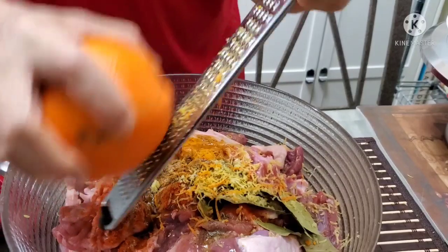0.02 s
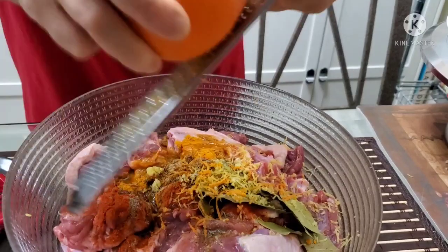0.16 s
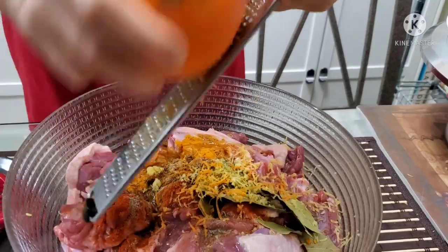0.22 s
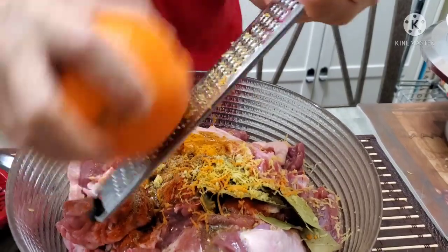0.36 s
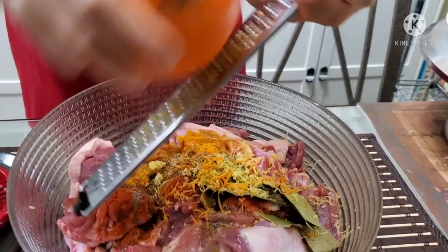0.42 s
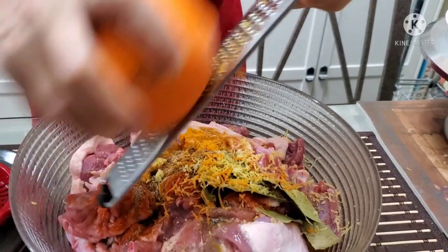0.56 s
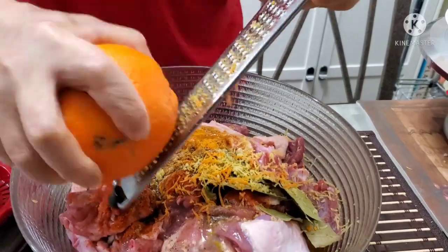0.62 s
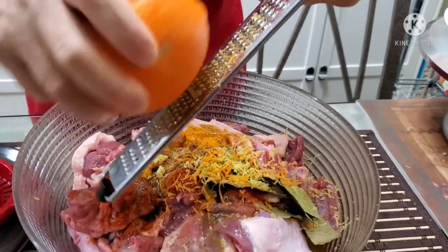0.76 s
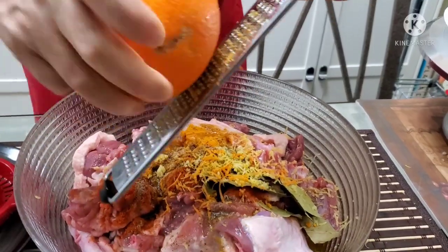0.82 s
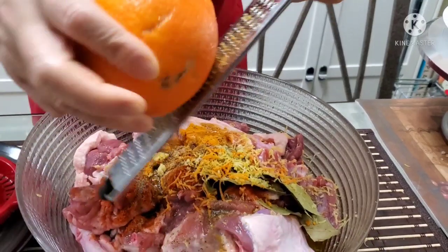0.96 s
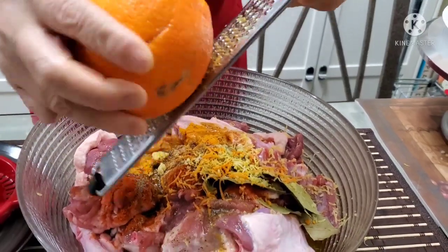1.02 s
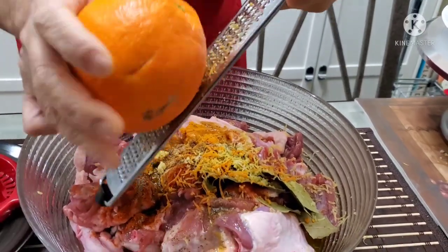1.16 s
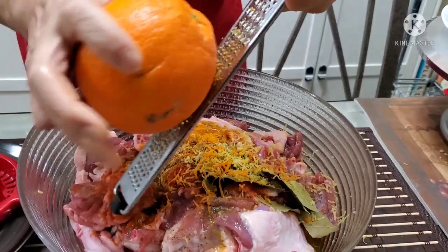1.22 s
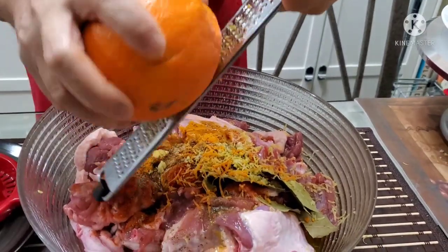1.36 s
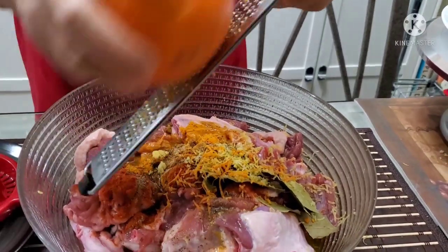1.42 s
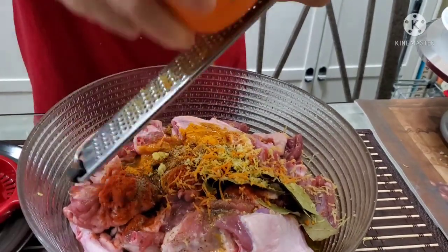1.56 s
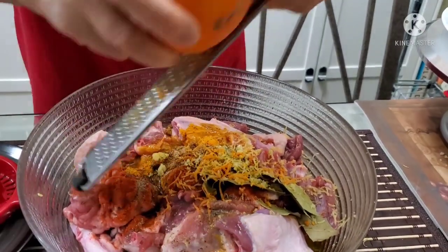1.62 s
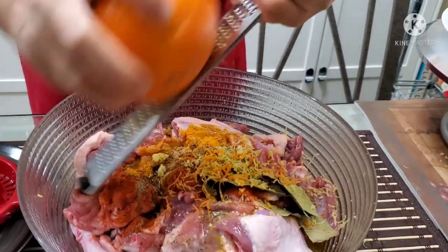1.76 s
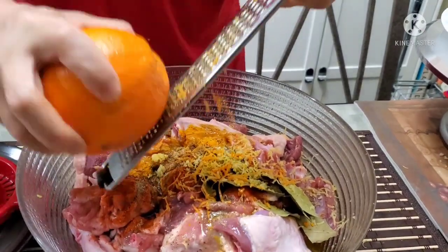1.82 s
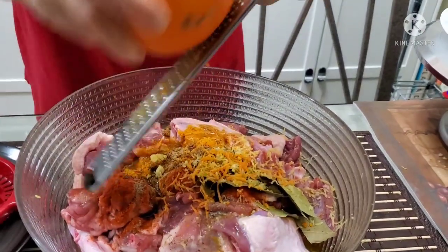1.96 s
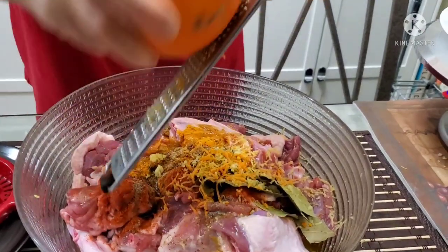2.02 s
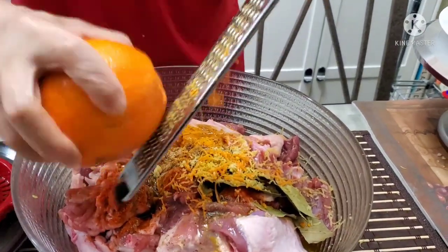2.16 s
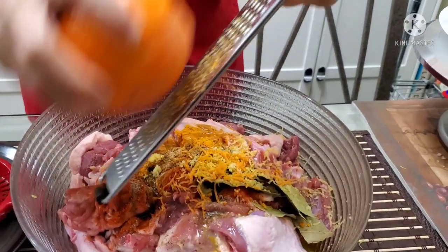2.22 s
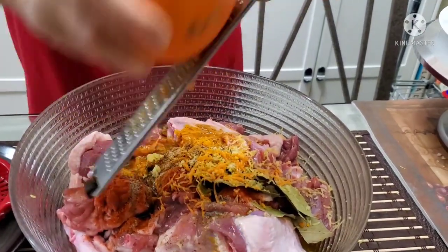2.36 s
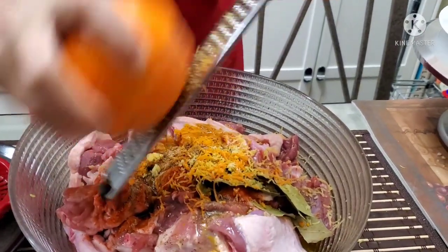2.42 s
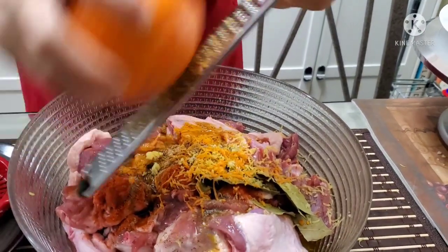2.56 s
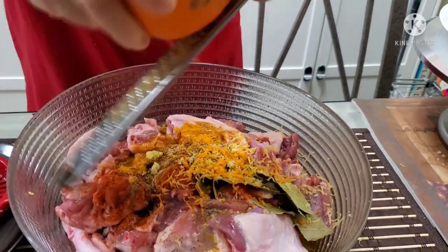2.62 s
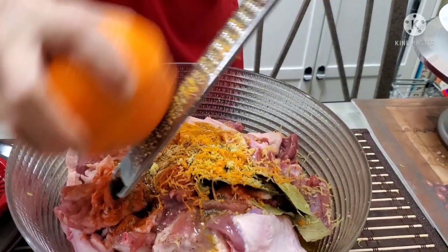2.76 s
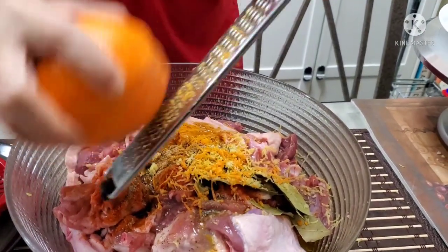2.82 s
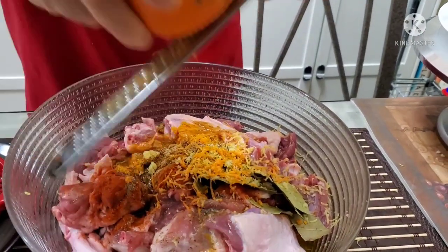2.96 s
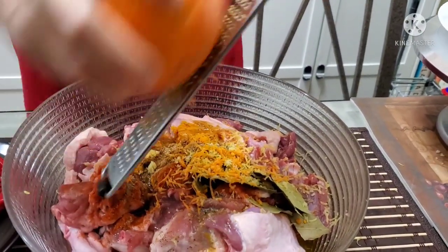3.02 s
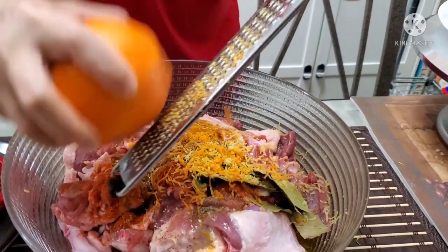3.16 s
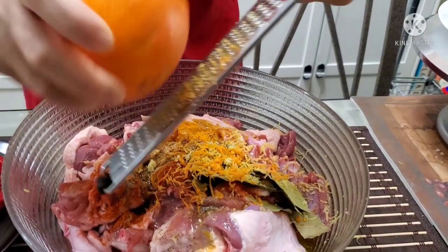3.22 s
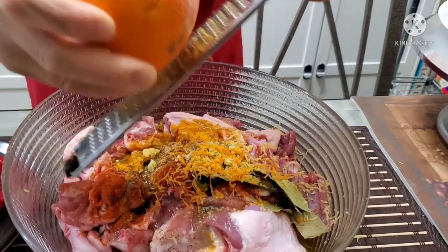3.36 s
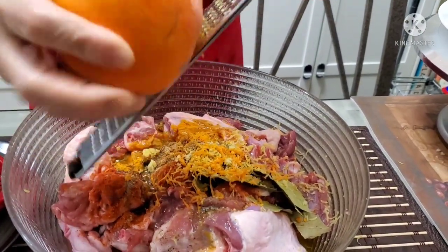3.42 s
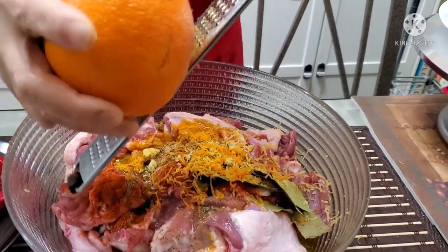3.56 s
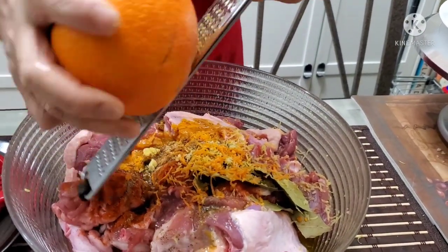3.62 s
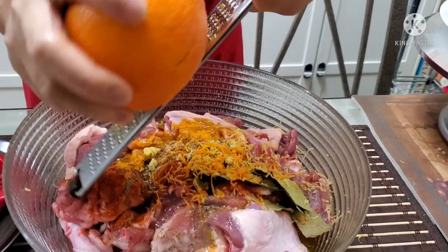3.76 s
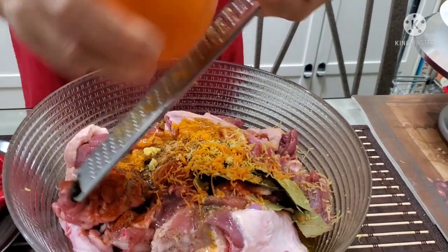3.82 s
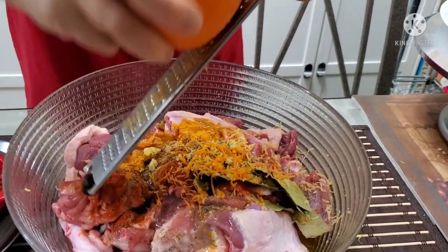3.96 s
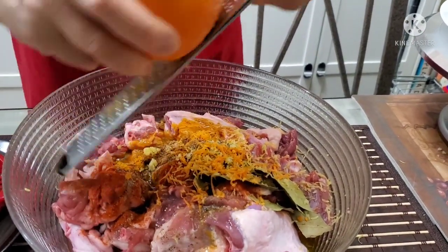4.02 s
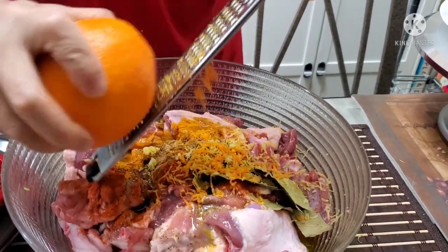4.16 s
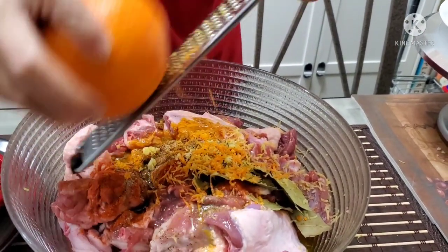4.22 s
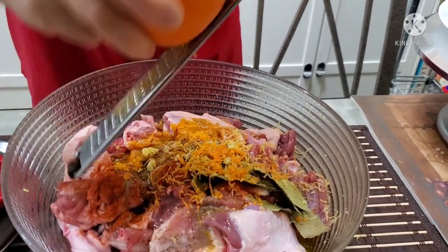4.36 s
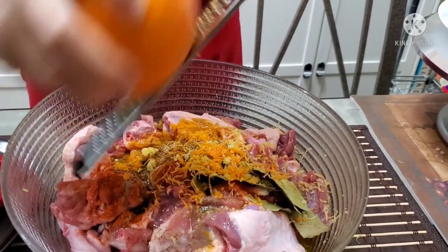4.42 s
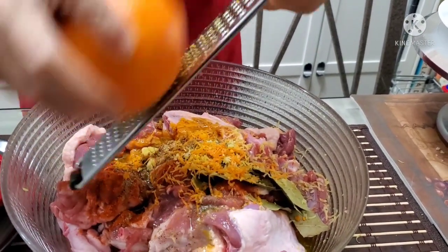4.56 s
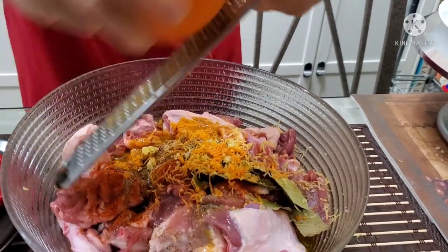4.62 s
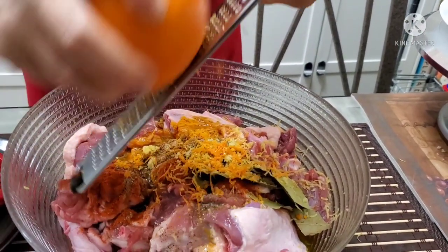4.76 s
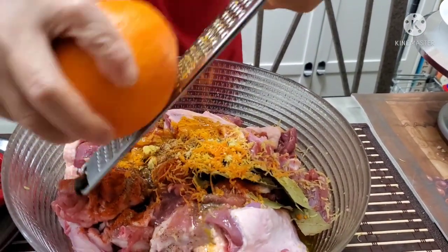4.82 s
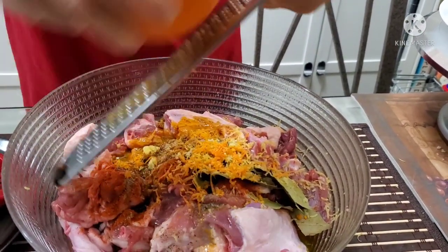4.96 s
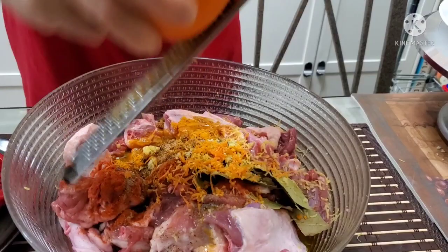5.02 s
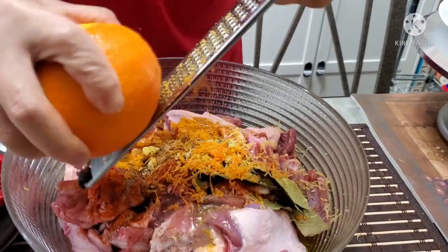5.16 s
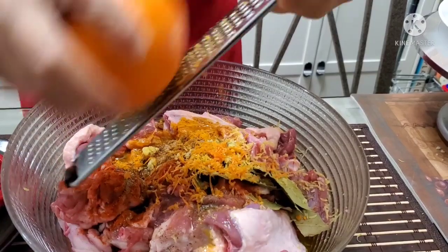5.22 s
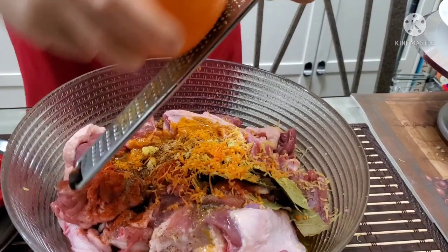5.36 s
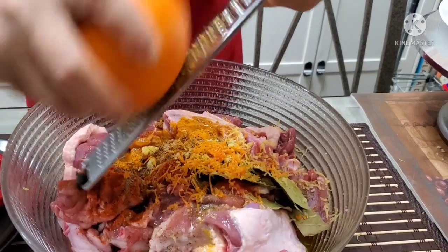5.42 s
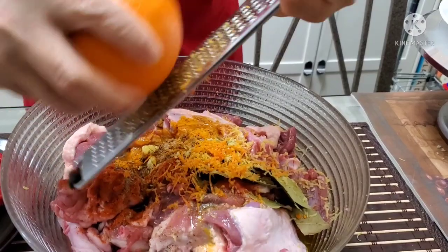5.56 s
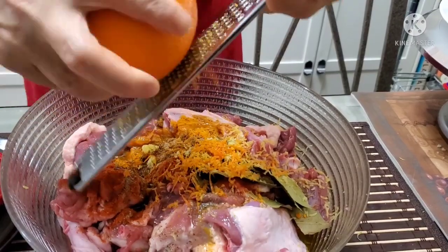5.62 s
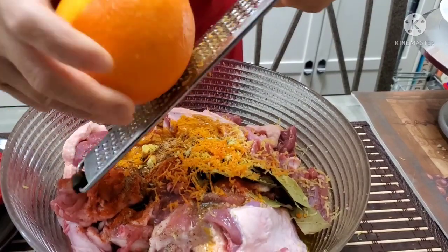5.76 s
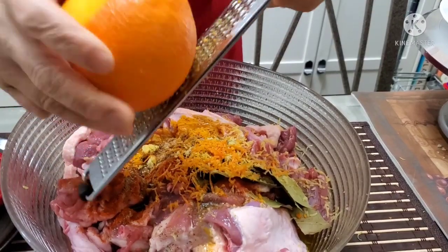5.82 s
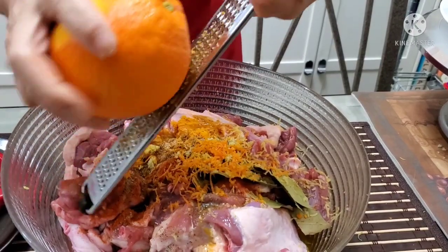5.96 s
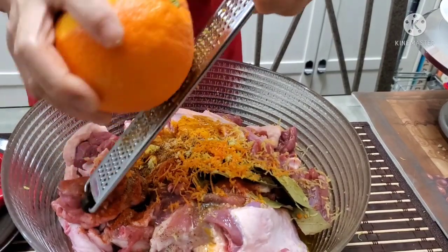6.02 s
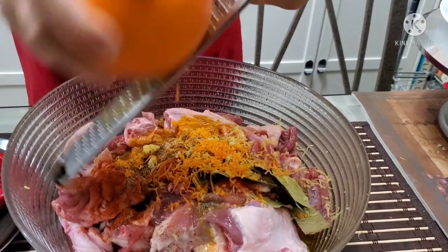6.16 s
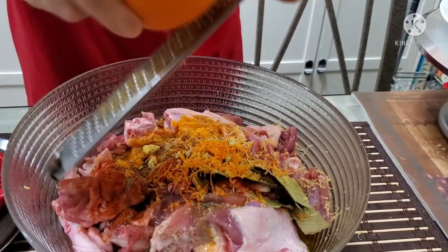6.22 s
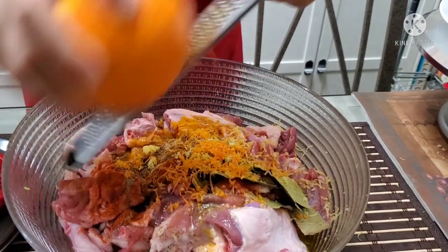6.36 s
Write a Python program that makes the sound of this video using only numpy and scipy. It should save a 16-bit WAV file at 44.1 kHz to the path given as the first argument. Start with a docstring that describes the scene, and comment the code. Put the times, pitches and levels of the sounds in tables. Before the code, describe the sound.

An orange is zested on a metal rasp in quick runs of scraping strokes, over a faint kitchen hum.

```python
"""Small kitchen, stereo microphone close to a long steel rasp over a glass bowl; an appliance hums.
An orange is being zested: each stroke drags the peel over rows of teeth, so fibres snap, the blade
rings and the oil fizzes. Three quick strokes open, the blade's tip bumping the bowl just after the
first. Before most strokes the fruit lands with a soft knock and a tick; fingers turn it between runs.
Runs of five follow at 1.8 s and 4.1 s, and a last run is just starting at 6.4 s."""
import sys
import numpy as np
from scipy import signal
from scipy.fft import rfft, irfft
from scipy.io import wavfile
from scipy.ndimage import uniform_filter1d, map_coordinates

SR = 44100
rng = np.random.default_rng(int(sys.argv[2]) if len(sys.argv) > 2 else 0)


def store_wav(level_fs):
    """Save 16-bit WAV to argv[1]."""
    pcm = np.round(np.clip(np.atleast_2d(level_fs), -1, 1) * 32767)
    wavfile.write(sys.argv[1], SR, pcm.T.astype(np.int16))


N = 282240
TIME = np.arange(N) / SR

# Event levels are relative, ahead of each layer's gain.
# peel drawn down the rasp: t/s, length/s, level/dB, extra ring/dB
PEEL_STROKES = [(-.022, 0.12, -26, -0.5), (0.292, 0.13, -28, 2.5), (0.601, 0.13, -26.5, .5),
                (1.757, 0.18, -30, -1.5), (2.123, 0.13, -29, -1), (2.445, 0.14, -29, 2),
                (2.758, .13, -27, -0.5), (3.083, 0.12, -26.5, -.5), (4.131, 0.14, -26.5, -8.5),
                (4.461, .131, -28.5, -1.5), (4.763, 0.19, -31.5, -0.5), (5.119, 0.14, -26.5, 0.5),
                (5.419, .16, -27.5, -4.5), (6.362, 0.15, -35, 3)]
# peel snagging on a few teeth: t/s, level/dB, t60/s, extra fizz/dB
PEEL_SNAGS = [(1.64, -68, 0.56, 8.5), (2.691, -50, .03, 3.5), (3.305, -42, 0.013, -7), (4.1, -53, .011, 16),
              (4.111, -47.5, 0.08, 13), (4.799, -34, 0.021, 0.5), (5.112, -41, 0.015, 3.5),
              (5.61, -38, 0.011, 12), (5.993, -63.5, .04, 21.5)]
# blade's tip bumping in the bowl: t/s, level/dB, t60/s
TIP_BUMPS = [(.133, -20.5, 0.046)]
# modes of the steel blade: f/Hz, width/Hz, relative level/dB
BLADE_MODES = [(559, 76, -15), (651, 54, -8), (931, 88, -9), (1111, 67, -5.5), (1239, 77, 2),
               (1375, 210, -4), (1479, 46, 2.5), (1666, 100, -2), (1747, 39.52, -7), (1952, 37, 0),
               (2145, 130, 0.5), (2217, 55, -0.5), (2414, 120, -18), (2572, 81, -7.5), (3220, 300, -16.5),
               (2990, 58, -10), (3380, 82, -13.5), (5096, 260, -19)]
# two lightly damped modes that linger between strokes: f/Hz, width/Hz, relative level/dB
SINGING_MODES = [(1650, 13, -3), (2300, 12, -1.5)]
# spectrum of tearing peel: f/Hz, relative level/dB
RASP_SPECTRUM = [(100, -4.5), (250, -20), (420, -14), (560, -12), (800, -1.5), (1050, -22), (1500, 6.5),
                 (2150, 1), (2800, -1.5), (4200, -6.5), (7000, -12), (16000, -21)]
# spectrum of the oil spray: f/Hz, relative level/dB
FIZZ_SPECTRUM = [(1000, -32.5), (3500, -21), (5500, -38.5), (7500, -14.5), (10000, -5), (12200, 0.5),
                 (13800, 0.5), (15500, 0.5)]
# spectrum of the blade's low shudder: f/Hz, relative level/dB
SHUDDER_SPECTRUM = [(20, -40), (42, -4.5), (60, -0.5), (90, -7.5), (140, -8.5), (260, -10.5), (600, -35),
                    (3000, -84)]
# fruit landing on the blade: t/s, knock level/dB, knock t60/s, tick level/dB
FRUIT_LANDINGS = [(.262, -42.5, 0.19, -54.5), (0.568, -43, 0.14, -57.5), (2.06, -39.5, 0.048, -45),
                  (2.417, -32, 0.065, -56), (2.717, -45.5, 0.092, -48.5), (3.064, -36.5, 0.28, -48),
                  (4.013, -39, 0.088, -50), (4.406, -37.5, 0.054, -52.5), (5.094, -35.5, 0.16, -50),
                  (5.395, -42.5, .08, -49), (6.331, -43, 0.32, -51.5)]
# fruit turned in the hand: middle t/s, length/s, level/dB, centre f/Hz, width/Hz
FINGER_RUBS = [(1.274, 0.53, -81, 2850, 681), (3.732, 0.41, -79, 11600, 900),
               (3.835, 0.22, -69.5, 1400, 1495)]
# decay of the kitchen's echo: f/Hz, t60/s
ECHO_DECAY = [(150, 0.93), (700, 0.28), (2000, 0.44), (4000, 0.37), (8000, 0.39), (15000, 0.21)]
# strength of that echo: f/Hz, level/dB
ECHO_SPECTRUM = [(100, -14), (600, -7.5), (1800, -10.5), (3500, -7.5), (7000, -9.5), (15000, -8.5)]
# tones of the appliance: f/Hz, relative level/dB
HUM_TONES = [(195, -1.5), (392, -16), (452, -25.5), (587, -27)]
# slow course of its hum: t/s, level/dB
HUM_COURSE = [(0, -55), (1.2, -58.5), (1.45, -55.5), (2.1, -56.5), (3.7, -57.5), (5.4, -55), (6.4, -61)]
# spectrum of the room tone: f/Hz, relative level/dB
ROOM_SPECTRUM = [(20, -37), (40, -4.5), (55, -0.5), (90, -7.5), (140, -5), (220, -4), (330, -8), (480, -16),
                 (750, -25), (1500, -32.5), (3000, -35), (7000, -45.5), (12000, -39.5), (15500, -37.5)]
# likeness of the room tone at the two capsules: f/Hz, correlation (0 to 1)
ROOM_LIKENESS = [(50, 0.84), (160, 0.92), (300, 0.46), (700, 0.13), (2000, 0.15)]
# colour of the two capsules: f/Hz, left minus right level/dB
CAPSULE_BALANCE = [(60, -3.5), (200, -1.5), (380, 6.5), (700, -2), (1300, -0.5), (2400, -.5), (4400, -4),
                   (8100, 1), (15000, 3.5)]


def zesting(speed, place, force, fizz, flex, ring):
    """Close up, rows of teeth bite in turn: fibres snap and rasp, the blade rings, oil sprays."""
    top_rows_hz, steel_hz, climb_hz_per_s, pitch_fall = 225, 1905, 55, 0.038
    bending_below_hz = 1050  # lower modes bend the whole blade
    row_hz = top_rows_hz * (.5 + .5 * speed) * (1 + 0.251 * wander(88.6))
    rows_passed = np.cumsum(row_hz) / SR
    teeth = unit_rms(np.exp(0.32 * np.cos(2 * np.pi * rows_passed)))
    tearing = teeth * snaps(per_s=11000, spread_db=0)
    spray = teeth * snaps(per_s=26000, spread_db=3)  # oil cells burst more densely than fibres break
    plucks = teeth * snaps(per_s=2500, spread_db=1.5)  # tougher fibres pluck the teeth
    # steel damped under the fruit: its pitch creeps up with the work and falls in mid-stroke
    pitch_hz = (steel_hz + climb_hz_per_s * TIME) * (1 - pitch_fall * place)
    damped_steel = unit_rms(resonate(teeth * snaps(per_s=2200, spread_db=1.5), pitch_hz, width_hz=720))
    ringing_modes = [mode for mode in BLADE_MODES if mode[0] >= bending_below_hz]
    bending_modes = [mode for mode in BLADE_MODES if mode[0] < bending_below_hz]
    return (amp(-3) * coloured(force * tearing, RASP_SPECTRUM)
            + amp(-4) * ring * damped_steel
            + amp(-2) * blade(ring * plucks, ringing_modes)
            + amp(-22) * blade(force * spray, SINGING_MODES)
            + amp(-14) * blade(flex * tearing, bending_modes)
            + amp(-22) * coloured(flex * spray, SHUDDER_SPECTRUM)
            + amp(-6) * coloured(fizz * spray, FIZZ_SPECTRUM))


def hand(usual_db=-28, oil_db=2.5, oil_follow=0.94, settle_db=-3.5, settle_t60=.15, flex_lag_s=.011):
    """Each stroke is one arch of speed; its pressure drives the rasp, the fizz and the ring."""
    speed, place, force, fizz, ring = np.zeros((5, N))
    for start, length, db, ring_db in PEEL_STROKES:
        travel = np.clip((TIME - start) / length, 0, 1) ** 1.08  # top speed comes a little late
        swing = (abs(np.sin(np.pi * travel)) * (travel < 1)) ** 1.35  # soft ends
        speed += swing
        place += (2 * travel - 1) * np.sqrt(swing)
        force += amp(db) * swing
        fizz += amp(usual_db + oil_db + oil_follow * (db - usual_db)) * swing
        ring += amp(db + ring_db) * swing ** 1.25
    # after each landing the peel drags a little as it settles
    settles = [(start, db + settle_db, settle_t60, oil_db) for start, _, _, db in FRUIT_LANDINGS]
    for start, db, t60, fizz_db in PEEL_SNAGS + settles:
        drag = burst(start, db, t60)
        force += drag
        ring += drag
        fizz += drag * amp(fizz_db)
    flex = amp(-25.5) * np.interp(TIME - flex_lag_s, TIME, speed)  # every stroke bends the blade alike
    flex += sum(burst(*bump) for bump in TIP_BUMPS)
    return speed, place, force, fizz, flex, ring


def snaps(per_s, spread_db):
    """Fibres or oil cells breaking: random clicks whose sizes scatter by spread_db."""
    size = amp(spread_db * np.clip(rng.standard_normal(N), -2, 2)) * rng.choice([-1, 1], N)
    return unit_rms(size * (rng.random(N) < per_s / SR))


def blade(drive, modes):
    """The steel rings in decaying modes; the wider a mode, the sooner it dies."""
    t = np.arange(SR // 2) / SR
    ring = sum((-1) ** k * amp(db) * width * np.exp(-np.pi * width * t) * np.cos(2 * np.pi * hz * t)
               for k, (hz, width, db) in enumerate(modes))
    return through(drive, ring / np.linalg.norm(ring))


def knocks(start_hz=195, rest_hz=52, sag_s=0.01, flesh_top_hz=300):
    """The fruit's weight settles on the blade: a dull thud that falls in pitch."""
    thuds, t = np.zeros(N), np.arange(SR // 3) / SR
    cycles = np.cumsum(rest_hz + (start_hz - rest_hz) * np.exp(-t / sag_s)) / SR
    for start, db, t60, _ in FRUIT_LANDINGS:
        knock = amp(db) * np.exp(-np.log(1000) * t / t60) * np.sin(2 * np.pi * cycles)
        part = thuds[round(start * SR):][:len(t)]
        part += knock[:len(part)]
    low_band = signal.butter(3, [rest_hz, flesh_top_hz], "band", fs=SR)
    flesh = unit_rms(signal.lfilter(*low_band, rng.standard_normal(N)))
    pressure = sum(burst(start, db, t60) for start, db, t60, _ in FRUIT_LANDINGS)
    return thuds + amp(-7) * uniform_filter1d(pressure, size=130) * flesh


def ticks(t60=0.0067):
    """As the fruit lands a tooth pricks the peel: a very short rasp with a spit of oil."""
    prick = sum(burst(start, db, t60) for start, _, _, db in FRUIT_LANDINGS)
    tear, spit = prick * rng.standard_normal((2, N))
    return amp(2) * (coloured(tear, RASP_SPECTRUM) + amp(-3) * coloured(spit, FIZZ_SPECTRUM))


def fingers(crackle_db=-90):
    """The damp zest crackles faintly, and skin slides softly over the peel."""
    sound = amp(crackle_db) * coloured(snaps(per_s=27, spread_db=18), FIZZ_SPECTRUM)
    for middle, length, db, hz, width_hz in FINGER_RUBS:
        swell = np.cos(np.pi * np.clip((TIME - middle) / length, -.5, .5))
        friction = unit_rms(resonate(snaps(per_s=2400, spread_db=7.5), hz, width_hz))
        sound += amp(db) * swell * friction
    return sound


def close_pair(source, place, lag_ms=0.11, sweep_ms=0.015, bounce_db=3.5, fade_s=0.0071, bounces=40):
    """Sound reaches the left capsule first; reflections off bowl and hands shift as they move."""
    lag_samples = (lag_ms + sweep_ms * place) * SR / 1000
    right = map_coordinates(source, [np.arange(N) - lag_samples], order=3)
    pair = np.array([source, right])
    poses = np.array([wander(22) for _ in range(9)])
    poses /= np.linalg.norm(poses, axis=0)  # the hands drift between poses, each with its reflections
    low_cut = signal.butter(2, 2100, "high", fs=SR)
    for side in pair:
        for pose in poses:
            delay_s = rng.uniform(.0004, .012, bounces)
            taps = np.zeros(SR // 20)
            taps[(delay_s * SR).astype(int)] = rng.choice([-1, 1], bounces) * np.exp(-delay_s / fade_s)
            taps = signal.lfilter(*low_cut, taps)
            side += amp(bounce_db) * through(source * pose, taps / np.linalg.norm(taps))
    return pair / np.hypot(1, amp(bounce_db))


def kitchen_echo(source, onset_s=0.0078):
    """The walls return a diffuse tail to each capsule, each band dying at its own speed."""
    hz, t, bands = signal.stft(rng.standard_normal((2, SR)), SR, nperseg=256)
    decay_per_s = np.log(1000) / at_hz(ECHO_DECAY, hz)[:, None]
    decay = np.exp(-decay_per_s * t) * np.sqrt(2 * decay_per_s / SR)
    bands = bands * amp(at_hz(ECHO_SPECTRUM, hz))[:, None] * decay
    fade_in = np.clip(TIME[:SR] / onset_s - .5, 0, 1)
    tails = signal.istft(bands, SR, nperseg=256)[1][:, :SR] * fade_in
    return np.array([through(source, tail) for tail in tails])


def appliance_hum(waver_db=2.45, pitch_drift=0.0109):
    """An appliance hums in the background, centred, wavering in pitch and level."""
    clock = np.cumsum(1 + pitch_drift * wander(11.2)) / SR
    tones = sum(amp(db) * np.sqrt(2) * np.sin(2 * np.pi * hz * clock) for hz, db in HUM_TONES)
    level_db = np.interp(TIME, *np.transpose(HUM_COURSE)) + waver_db * wander(5.1)
    return tones * amp(level_db)


def room_tone(level_db=-59):
    """Low noise all round the microphone, nearly alike on both sides in the bass."""
    hz = np.fft.rfftfreq(N, 1 / SR)
    left, unrelated = rfft(rng.standard_normal((2, N)))
    likeness = np.clip(at_hz(ROOM_LIKENESS, hz), 0, 1)
    right = likeness * left + np.sqrt(1 - likeness ** 2) * unrelated
    air = irfft(np.array([left, right]) * amp(at_hz(ROOM_SPECTRUM, hz)), N)
    return amp(level_db) * unit_rms(air)


def amp(db):
    """Decibels to gain."""
    return 10 ** (np.asarray(db) / 20)


def unit_rms(x):
    """Scales to an rms of 1."""
    return x / np.sqrt(np.mean(x ** 2) + 1e-20)


def at_hz(table, hz):
    """Reads a table on a log-frequency axis."""
    table_hz, value = np.transpose(table)
    return np.interp(np.log(hz + 1), np.log(table_hz + 1), value)


def wander(rate_hz):
    """Smooth random motion of rms 1, rolling off above the rate."""
    hz = np.fft.rfftfreq(N, 1 / SR)
    return unit_rms(irfft(rfft(rng.standard_normal(N)) * np.exp(-(hz / rate_hz) ** 2), N))


def burst(start, db, t60):
    """An envelope that jumps up and dies away."""
    envelope, span = np.zeros(N), slice(round(start * SR), round((start + t60) * SR))
    envelope[span] = amp(db) * np.exp(-np.log(1000) * (TIME[span] - start) / t60)
    return envelope


def through(x, taps):
    """Plays x through an impulse response."""
    return signal.oaconvolve(x, taps)[:N]


def coloured(x, spectrum, size=4096):
    """Plays x through a causal filter of unit energy with the given spectrum."""
    log_gain = np.log(amp(at_hz(spectrum, abs(np.fft.fftfreq(size, 1 / SR)))))
    taps = np.fft.ifft(np.exp(np.conj(signal.hilbert(log_gain)))).real
    return through(x, taps / np.linalg.norm(taps))


def resonate(x, hz, width_hz):
    """A resonance that can follow a moving pitch."""
    carrier = np.exp(2j * np.pi * np.cumsum(hz * np.ones(len(x))) / SR)
    pole = np.exp(-np.pi * width_hz / SR)
    baseband = signal.lfilter([(1 - pole) ** 2], [1, -2 * pole, pole * pole], x / carrier)
    return (carrier * baseband).real


def scene():
    """The rasp close to the microphone, the kitchen around it."""
    speed, place, force, fizz, flex, ring = hand()
    rasp = zesting(speed, place, force, fizz, flex, ring) + ticks() + knocks() + fingers()
    return close_pair(rasp, place) + kitchen_echo(rasp) + room_tone() + appliance_hum()


def record(dry):
    """The microphone: each capsule has its own colour, and the top treble is cut off."""
    top_hz = 15750
    tilt_db = at_hz(CAPSULE_BALANCE, np.fft.rfftfreq(N, 1 / SR)) / 2
    heard = irfft(rfft(dry) * amp([tilt_db, -tilt_db]), N)
    high_cut = signal.firwin(511, top_hz, window=("kaiser", 9), fs=SR)
    return signal.oaconvolve(heard, high_cut[None], "same")


dry = scene()
out = record(dry)
store_wav(out)
```